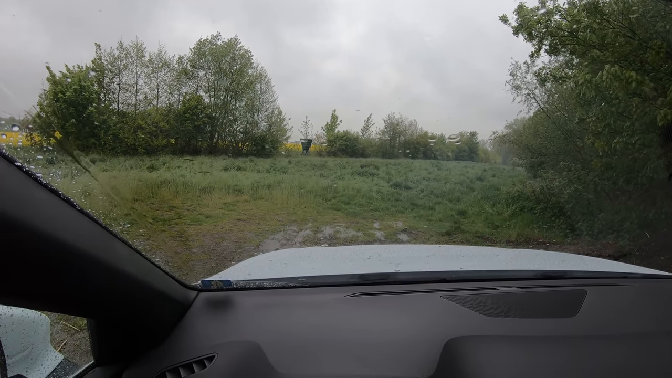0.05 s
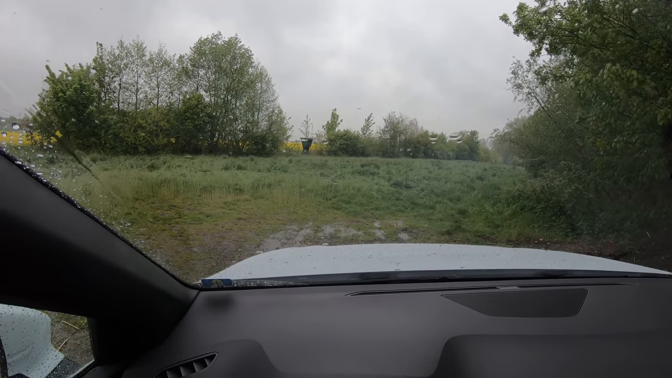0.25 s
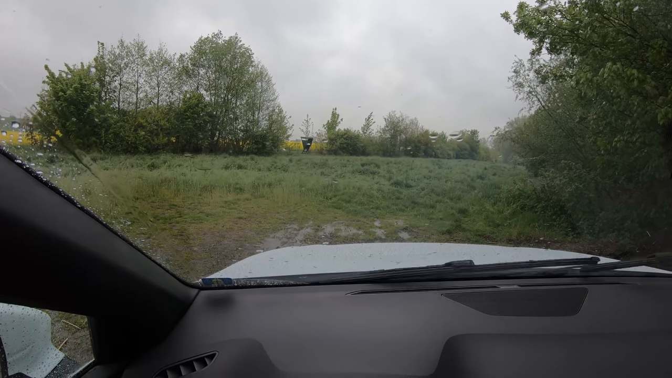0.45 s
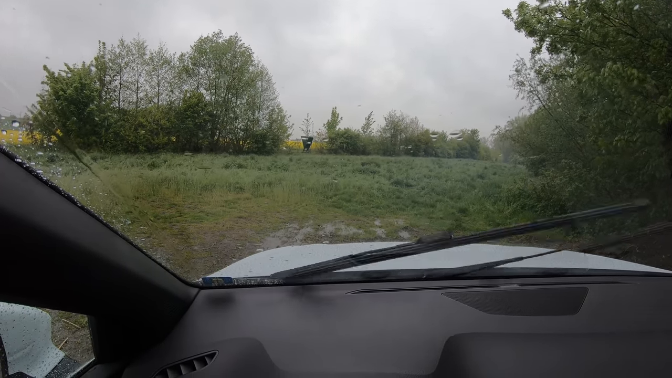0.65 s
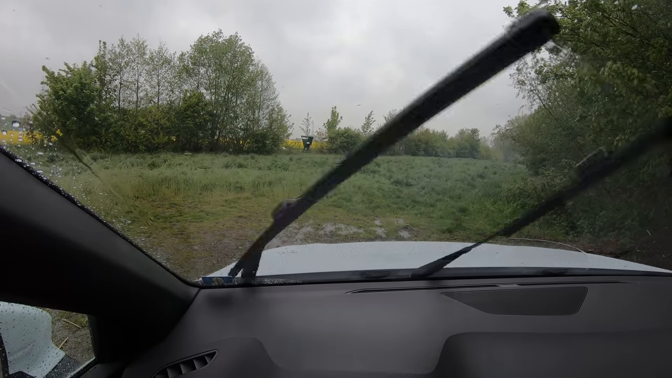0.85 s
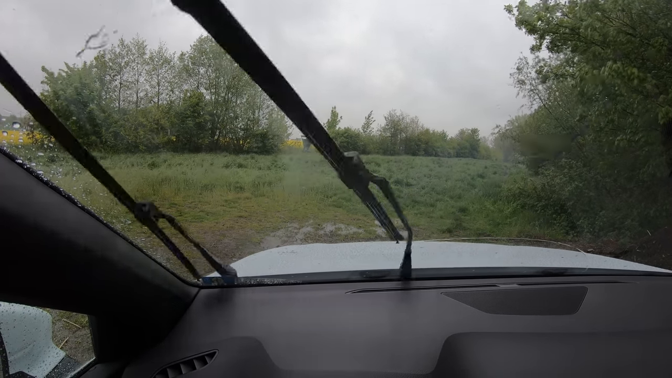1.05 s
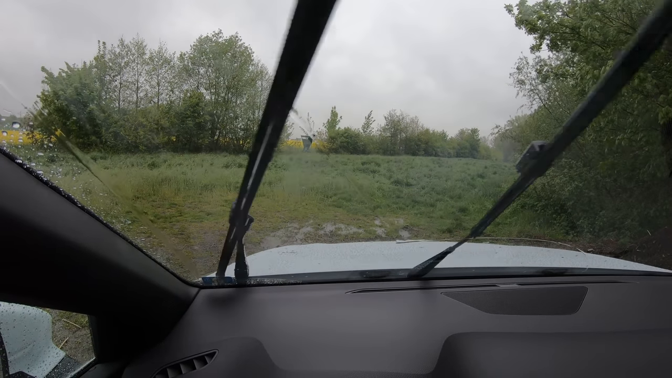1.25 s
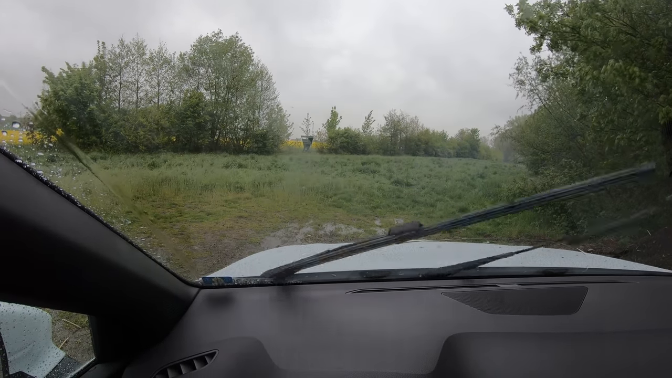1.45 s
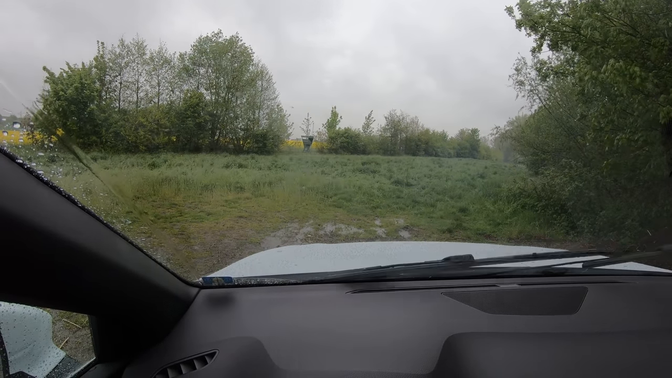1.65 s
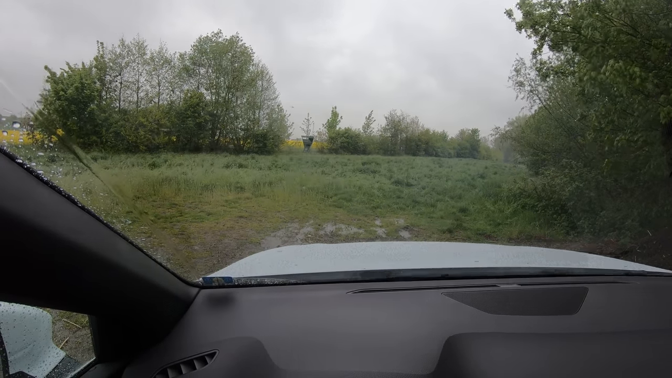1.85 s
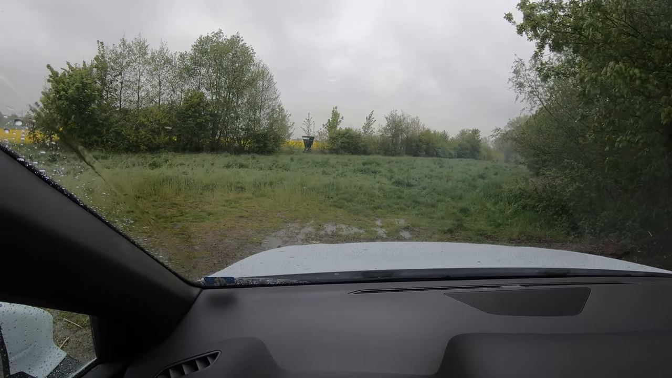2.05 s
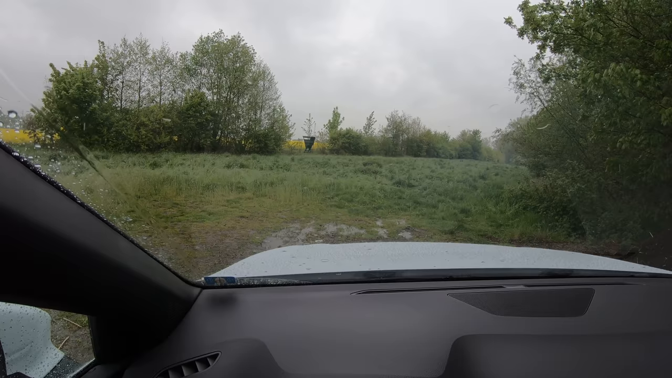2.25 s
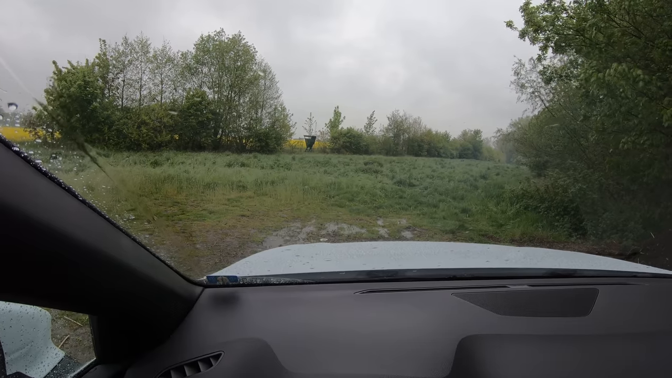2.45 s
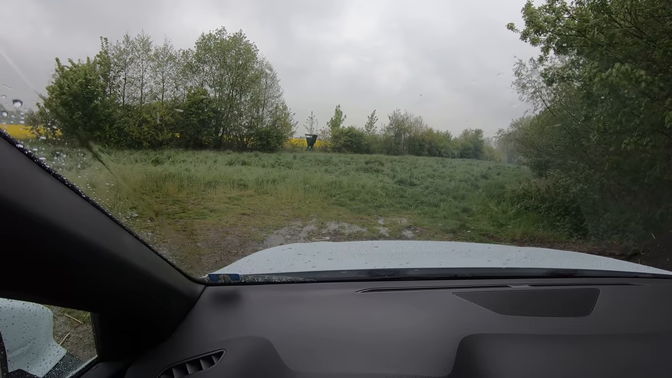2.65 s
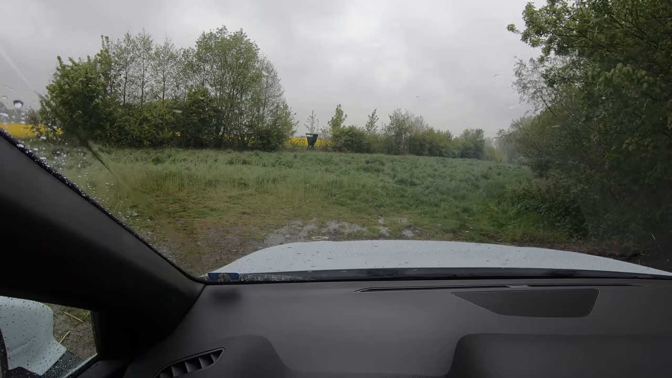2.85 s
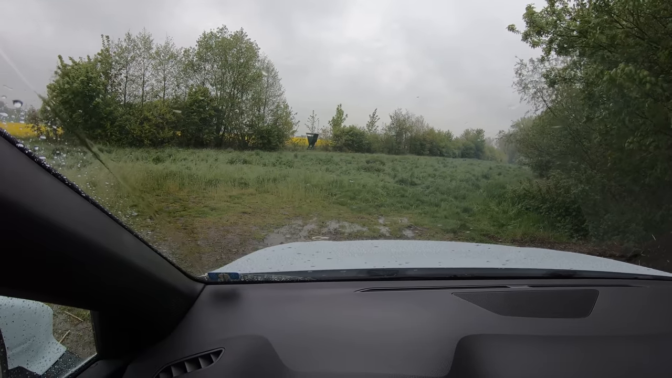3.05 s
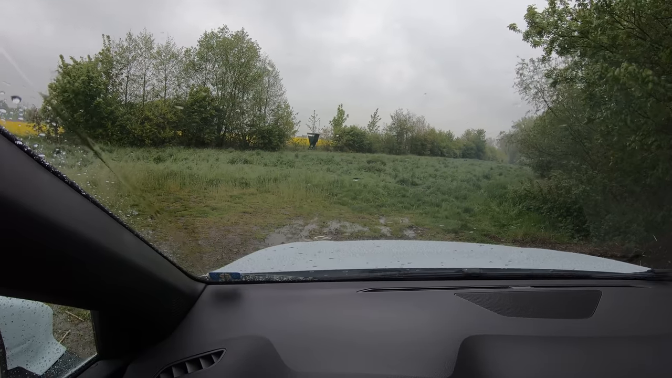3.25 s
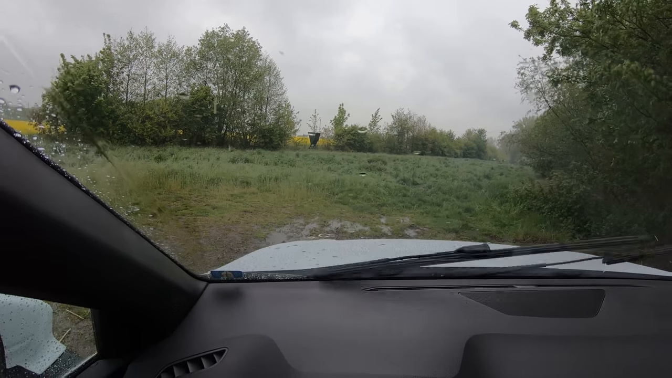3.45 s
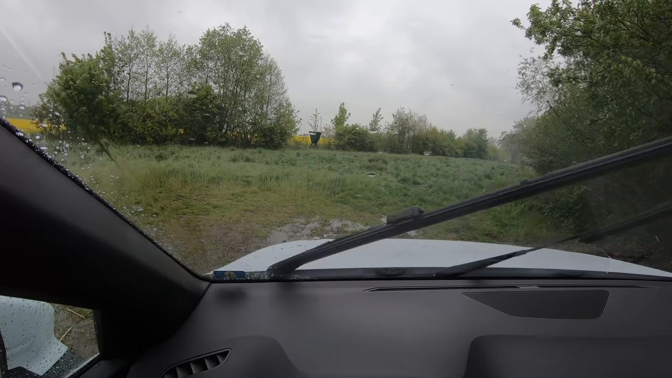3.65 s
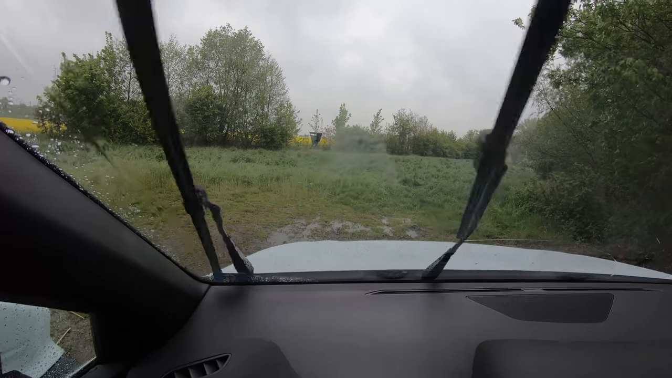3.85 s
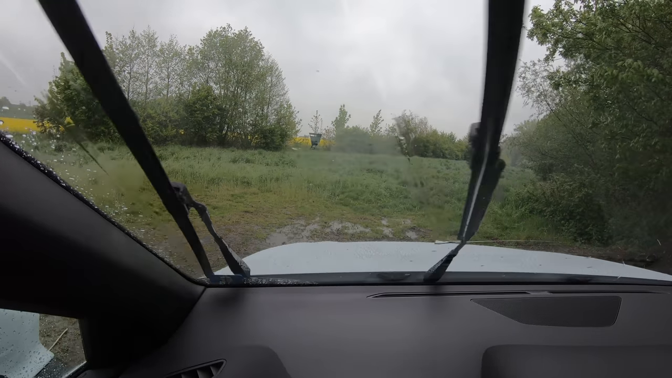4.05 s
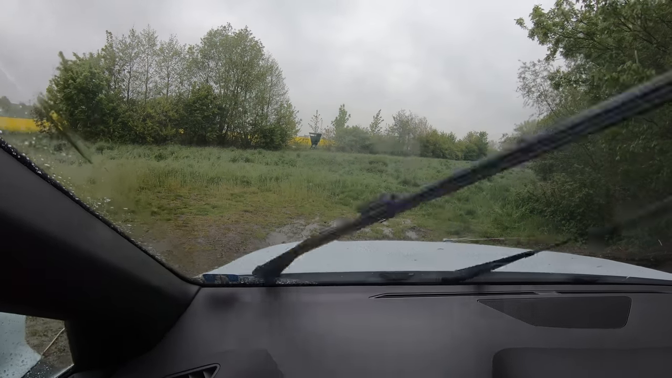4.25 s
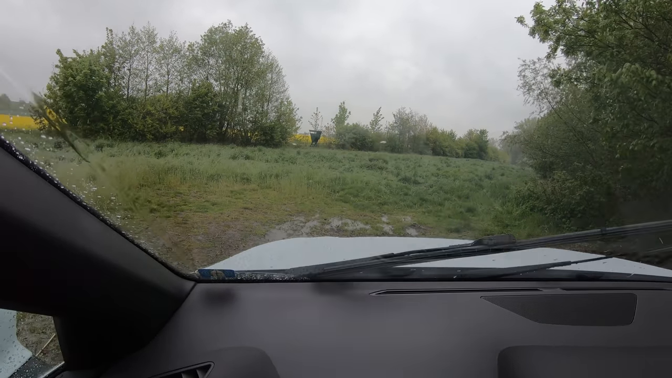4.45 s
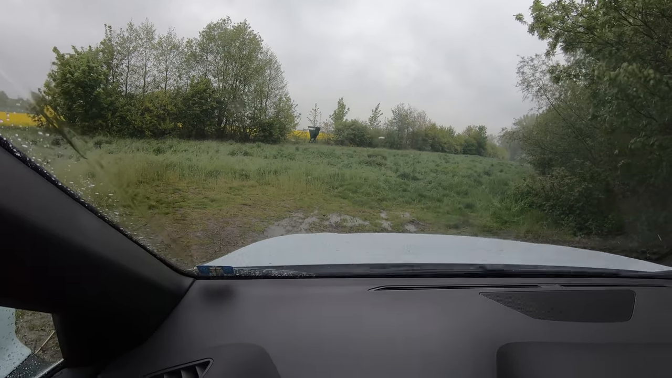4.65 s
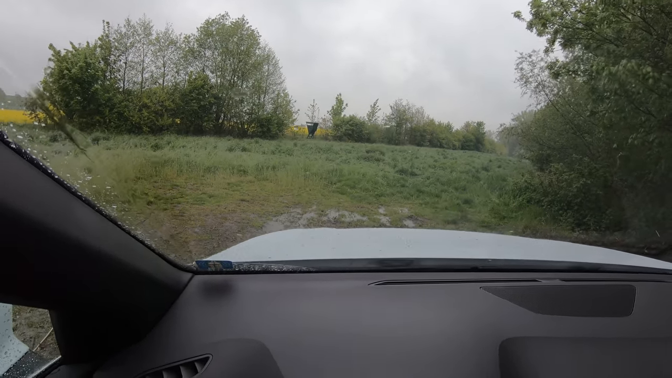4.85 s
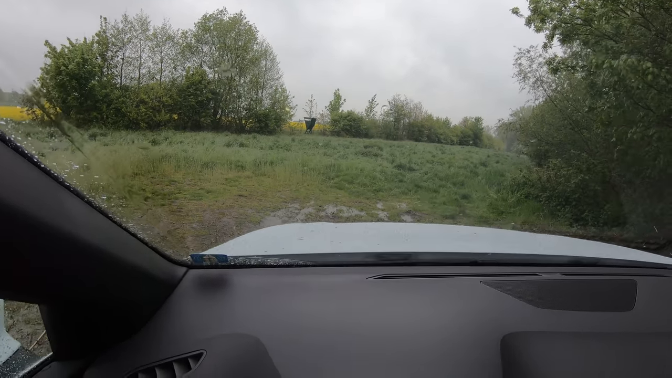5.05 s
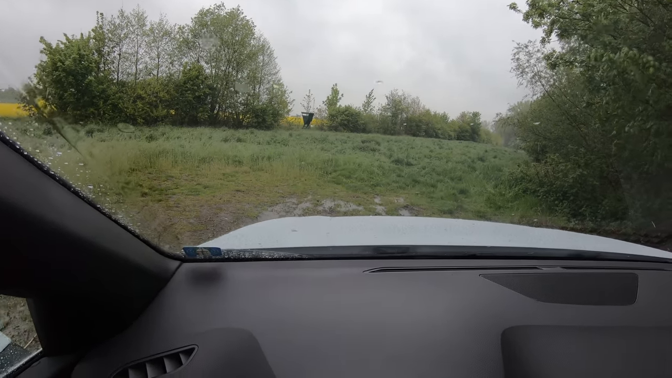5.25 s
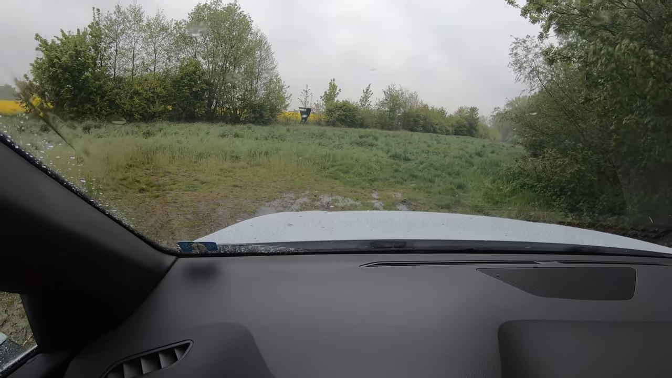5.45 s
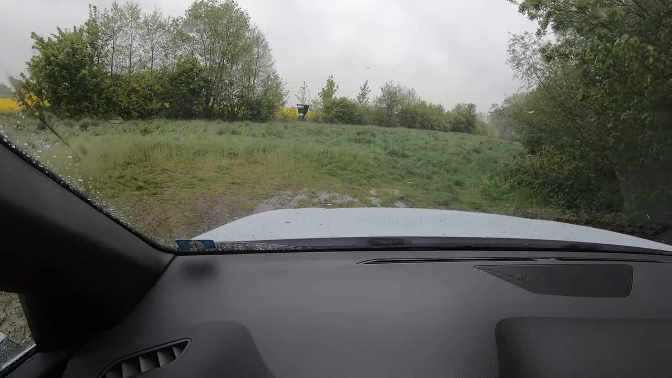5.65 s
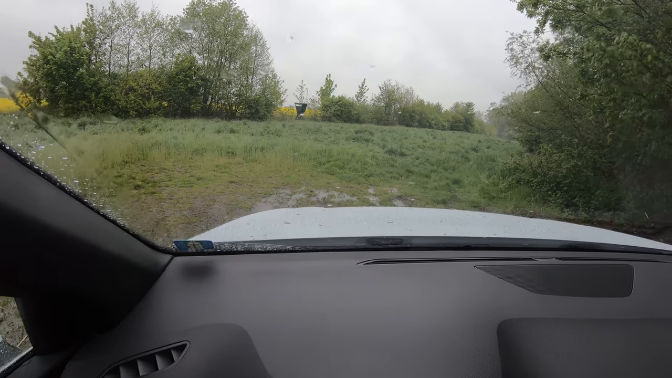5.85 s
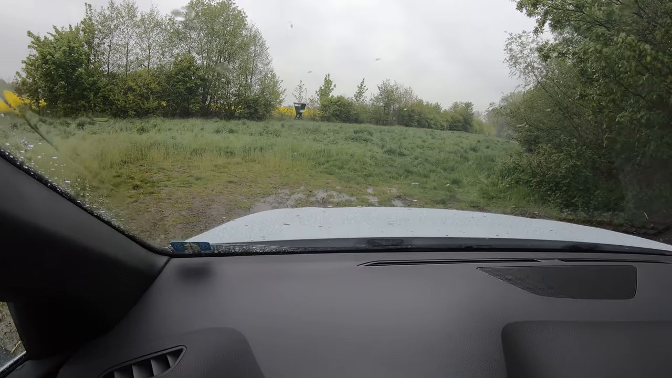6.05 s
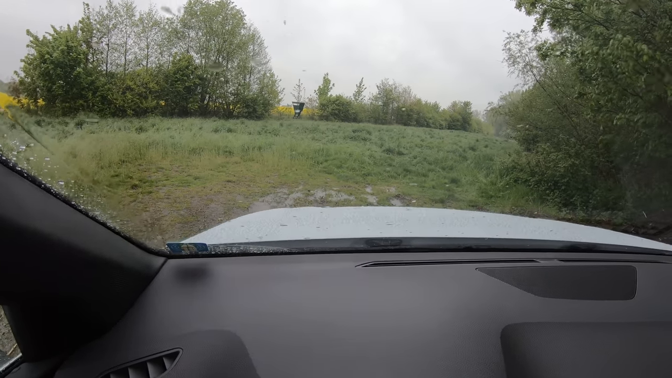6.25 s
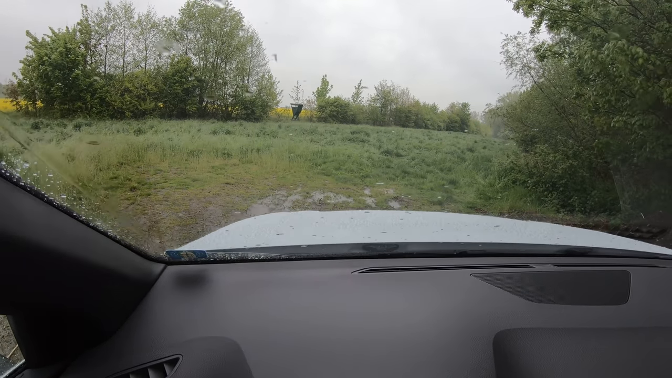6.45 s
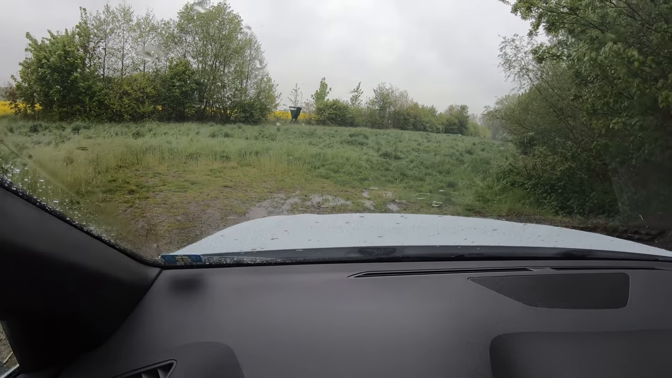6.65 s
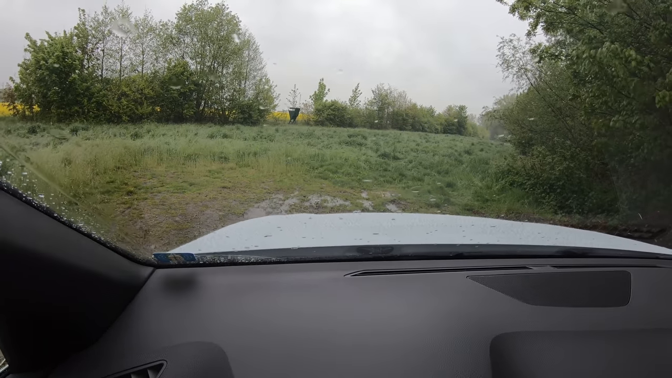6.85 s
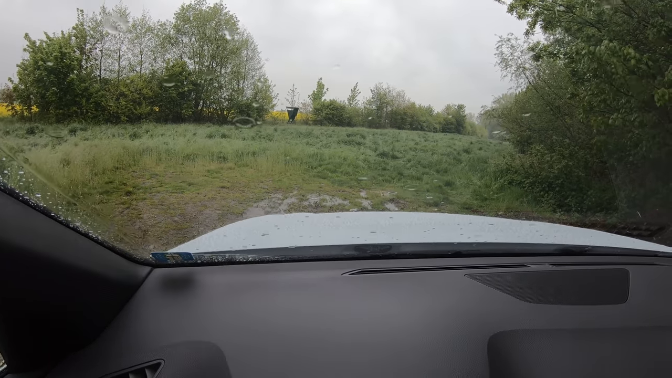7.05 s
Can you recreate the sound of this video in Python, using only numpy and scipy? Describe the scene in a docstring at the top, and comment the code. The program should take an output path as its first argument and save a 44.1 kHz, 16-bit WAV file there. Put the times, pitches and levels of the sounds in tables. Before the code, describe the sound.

A stereo microphone in a quiet car interior catches two slow windscreen wiper cycles. Each begins with a low, woody knock and motor throb, thuds again at the turn, and returns with short low groans of rubber. The wiper sound is bassy and central; fine rain patter, fat drops and sharp ticks on glass surround it, continuing alone at the end.

```python
"""Wipers make two slow sweeps and rest, heard from inside a parked car in light rain.
Motor and linkage shake the low modes of the body shell: noise throbs with the shaft, pushes ring as thuds
when the wipes start and when the blades flip, and short tones swell as the blades judder.
Drops, as noise bursts through resonances, tap roof and glass over a soft wash of random spectra.
A fine wet hiss, a faint steady hum and one brief puff of treble noise complete the cabin."""
import sys
import numpy as np
from scipy import signal
from scipy.io import wavfile
from scipy.ndimage import uniform_filter1d

SR = 44100
rng = np.random.default_rng(int(sys.argv[2]) if len(sys.argv) > 2 else 0)


def store_wav(level_fs):
    """Save 16-bit WAV to argv[1]."""
    pcm = np.round(np.clip(np.atleast_2d(level_fs), -1, 1) * 32767)
    wavfile.write(sys.argv[1], SR, pcm.T.astype(np.int16))


N = 313255  # length in samples

SHAFT_HZ = 38.5  # wiper motor shaft, also the pitch of the lowest cabin mode
UPPER_HZ = 270  # shell modes above this count as upper modes

# the rain over time: (time [s], level [dB], treble tilt [dB per octave], wet hiss level [dB])
RAIN_COURSE = [(0.0, -57.5, -1, -78.5), (.4, -55.5, -3.5, -64.5), (.8, -56, -2, -67.5),
               (1.14, -54.5, -5.5, -65.5), (1.28, -50.5, -4.5, -64), (1.58, -60, -2, -71.5),
               (1.94, -51.5, -6, -65), (2.3, -58.5, -2, -72.5), (2.65, -54.5, -1, -69.5),
               (3.0, -54.5, -3, -86.5), (3.3, -53.5, -3, -64), (3.749, -59, 3.5, -88),
               (4.1, -52, -0.5, -69), (4.5, -62, 2.5, -72.5), (5.05, -60.5, 2.5, -77.5),
               (5.5, -59.5, 0, -94), (5.8, -58, 2.5, -76), (6.118, -55.5, 2, -63.5),
               (6.5, -57.5, 1.5, -79.5), (7.1, -58, 0.5, -77)]
# shell and dashboard modes: (frequency [Hz], level [dB], t60 [s])
SHELL_MODES = [(66.5, -7, 0.57), (78.8, -4.5, 0.29), (98.6, -14.5, 0.4), (120, -5.5, 0.22),
               (136, 6.5, 0.16), (173, -9, 0.37), (225, -18, 0.46), (296, -8, 0.13), (343, -8, 0.21),
               (368.7, -10.5, .08), (394, -24.5, 0.02), (455, -28, 0.25), (622, -11.5, 0.032),
               (860, -34.5, 0.082), (1100, -44.5, 0.061), (1445, -46.5, .04)]
# starts of the wipes, which both run the same course: (time [s])
WIPE_STARTS = [.26, 3.162]
# one wipe, up, flip, down and park: (time after the start [s], linkage drag [dB],
# pitch of the dragging arm [Hz], deep sway [dB], blade rub [dB], lowest cabin mode [dB])
WIPE_COURSE = [(0, -39.5, 159, -65.5, -64.5, -58.5), (.1, -23, 129.5, -56, -40, -66),
               (.21, -40, 111.5, -70, -76.5, -34), (.33, -42, 110, -65, -61, -39),
               (.5, -48, 157, -64, -59, -59.5), (.7, -50.5, 158.4, -63, -58.5, -93),
               (.83, -47, 165, -63, -56, -59), (.96, -61.5, 122, -58.5, -42.5, -31),
               (1.05, -39.5, 113.2, -56, -55.5, -44), (1.2, -45, 132.7, -59, -72, -45),
               (1.43, -41.5, 121, -49, -55.5, -43.5), (1.65, -45, 129.6, -46, -70, -56.5),
               (1.77, -32.5, 120, -56.5, -75, -48.5), (1.9, -67.5, 100.4, -83.5, -81, -70),
               (2.1, -92, 143, -79, -74, -77)]


def amp(db):
    """dB to gain."""
    return 10 ** (np.asarray(db) / 20)


def evened(x):
    """Scales to rms 1."""
    return x / np.sqrt(np.mean(x ** 2) + 1e-20)


def peaked(x):
    """Scales to peak 1."""
    return x / abs(x).max()


def read(points, hz):
    """Reads a spectrum table at the given frequencies, along a log frequency axis."""
    f, value = np.transpose(points)
    return np.interp(np.log(hz + 1), np.log(f + 1), value)


def add(mix, s, sound):
    """Mixes a sound in at s seconds, cut off at the end of the mix."""
    part = mix[..., round(s * SR):][..., :sound.shape[-1]]
    part += sound[..., :part.shape[-1]]


def ring(x, hz, width):
    """A two-pole band-pass resonance whose response to a unit click has height 1."""
    r, w = np.exp(-np.pi * width / SR), 2 * np.pi * hz / SR
    return signal.lfilter([.5, 0, -.5], [1, -2 * r * np.cos(w), r * r], x)


def glide(x, hz, width):
    """A moving resonance: shift the curve hz to zero, smooth twice, shift back."""
    turn = np.exp(2j * np.pi * np.cumsum(hz) / SR)
    r = np.exp(-np.pi * width / SR)
    smooth = signal.lfilter([1 - r], [1, -r], x / turn)
    smooth = signal.lfilter([1 - r], [1, -r], smooth)
    return (turn * smooth).real


def coloured(x, points):
    """Causal (minimum-phase) filter with the given spectrum, floored at -100 dB."""
    gain_db = read(points, abs(np.fft.fftfreq(4096, 1 / SR)))
    log_gain = np.log(amp(np.maximum(gain_db, -100)))
    taps = np.fft.ifft(np.exp(np.conj(signal.hilbert(log_gain)))).real[:2048]
    taps = taps.reshape((1,) * (x.ndim - 1) + (-1,))
    return signal.oaconvolve(x, taps, axes=-1)[..., :x.shape[-1]]


def rain_level():
    """How hard the rain falls, as a gain over time."""
    s, level_db, *_ = np.transpose(RAIN_COURSE)
    return amp(np.interp(np.arange(N) / SR, s, level_db))


def wash():
    """Distant rain merges into noise: random short-time spectra with drifting patches."""
    # spectrum of the wash: (frequency [Hz], relative level [dB])
    wash_colour = [(120, 0), (200, 6), (283, -4.5), (472, -2), (625, -5.5), (775, 1.5), (899, -9.5),
                   (1080, -5.5), (1830, -7), (2340, -16), (3480, -21.5), (7820, -27.5), (10400, -40),
                   (13500, -88), (22000, -120)]
    # left-right likeness: (frequency [Hz], share in common [-1 to 1])
    likeness = [(100, 0), (300, 1), (600, 0.19), (1200, 0), (2500, 0.4), (5000, 0.12), (9000, 0.)]
    frames, hz = N // 256 + 5, np.fft.rfftfreq(1024, 1 / SR)
    a, b, c, d, patches = rng.standard_normal((frames, 513, 5)).T
    patches = uniform_filter1d(patches, size=40, axis=0)  # across frequency
    patches = evened(uniform_filter1d(patches, size=5, axis=1))  # across time
    same = np.clip(read(likeness, hz), -1, 1)[:, None]
    left = a + 1j * b
    right = same * left + np.sqrt(1 - same ** 2) * (c + 1j * d)
    s, _, tilt_db, _ = np.transpose(RAIN_COURSE)
    t = np.arange(frames) * 256 / SR
    treble = np.clip(np.log2(hz / 1500 + 1e-9), 0, 2)[:, None]  # octaves above 1500 Hz, at most 2
    level_db = read(wash_colour, hz)[:, None] + 2.2 * patches + treble * np.interp(t, s, tilt_db)
    spectra = np.array([left, right]) * amp(level_db)
    return evened(signal.istft(spectra, nperseg=1024, noverlap=768)[1][:, :N])


def patter(count=12):
    """Many small drops, each a short noisy tap on one panel, left or right; a few are larger."""
    # colour of small drops on roof and glass: (frequency [Hz], filter gain [dB])
    tap_colour = [(120, -17), (200, 35), (269, -17.5), (387, 0), (576, -7), (1110, 8), (1380, 2), (3430, 3),
                  (4040, -11), (7820, -93.5), (10400, -36), (13500, -100.5), (22000, -120)]
    taps_per_s, level_db = 1100, -4  # average rate; level against the wash ahead of the cabin colour
    size = amp(4.5 * np.minimum(rng.exponential(1, N), 4))
    size = size * (rng.random(N) < taps_per_s / SR)
    panel = rng.integers(0, count, N)
    t, out = np.arange(2500) / SR, np.zeros((2, N))
    for k, hz in enumerate(np.geomspace(400, 6000, count)):
        crack = rng.standard_normal((2, len(t))) * amp(-60 * t / 0.021)
        tap = crack + 2 * evened(ring(crack, hz, .5 * hz)) * crack.std()
        tap = tap + 0.73 * tap[::-1]  # each channel hears some of the other
        side = amp(7.6 * (-1) ** k * np.array([[1], [-1]]))  # panels alternate left and right
        hits = (size * (panel == k))[None]
        out += side * signal.oaconvolve(hits, tap, axes=1)[:, :N]
    return amp(level_db) * evened(coloured(out, tap_colour))


def fizz():
    """A band of grainy wet hiss: noise with a fast random level, partly alike in both channels."""
    s, *_, db = np.transpose(RAIN_COURSE)
    noise = rng.standard_normal((2, N))
    flicker = evened(uniform_filter1d(rng.standard_normal((2, N)), size=220, axis=1))
    grain = amp(3.8 * flicker)  # it crackles finely
    band = ring(grain * (noise + 0.4 * noise[::-1]), 3090, 1800)
    band = ring(band, 3000, 1900)
    return amp(np.interp(np.arange(N) / SR, s, db)) * evened(band)


def hum():
    """A thin steady low tone with noise in narrow resonances around it."""
    # noise around the tone: (frequency [Hz], width [Hz], level [dB])
    hum_bands = [(151.4, 4.6, -66), (165, 20, -63)]
    tone_hz, tone_db = 148.4, -58.5
    out = amp(tone_db) * np.sqrt(2) * np.sin(2 * np.pi * tone_hz * np.arange(N) / SR)
    for x, (hz, width, db) in zip(rng.standard_normal((len(hum_bands), N)), hum_bands):
        out = out + amp(db) * evened(ring(ring(x, hz, width), hz, width))
    return out


def boom():
    """A low tone at the shaft rate with some noise in the same mode, fed by the wipes and by rocking."""
    # brief low rocking swells of the body: (middle [s], level [dB], half-length [s])
    rocks = [(2.528, -65, 0.085), (4.894, -39.5, 0.076), (5.043, -53, 0.096), (6.913, -63, 0.093)]
    still_db = -83  # the lowest mode at rest
    t, (s, *_, db) = np.arange(N) / SR, np.transpose(WIPE_COURSE)
    level = amp(still_db)
    for start in WIPE_STARTS:
        level = level + amp(np.interp(t - start, s, db, -120, -120))
    for mid, top_db, length in rocks:
        level = level + amp(top_db) * np.exp(-2 * ((t - mid) / length) ** 2)
    mode_noise = evened(ring(rng.standard_normal(N), SHAFT_HZ, 4.3))
    return level * evened(np.sin(2 * np.pi * SHAFT_HZ * t) + 0.45 * mode_noise)


def drops():
    """Fat drops shake the roof modes; sharp ones click across the treble."""
    # fat drops on the roof: (time [s], level [dB], pitch between the two middle modes [Hz],
    # lowest mode [dB], top mode [dB], left over right [dB])
    pats = [(0.161, -45, 764, -9, 1, -3), (0.228, -56.5, 748, -13, 17, -4), (0.601, -50, 703, -4, 1, -4),
            (0.643, -48, 732, -17, -0.5, -2), (0.795, -46, 1010, -29, -26, 5),
            (0.824, -48.5, 1030, -5, -13, 1), (0.91, -43.5, 770, -10, -18, 2),
            (1.087, -43.5, 1050, -4, 1, 1), (1.251, -42, 718, -12, -31, -7.5),
            (1.432, -48, 1140, -1, -26, -3), (1.49, -50, 727, -22, -19, -3), (1.601, -47, 961, -15, -6, 3),
            (1.824, -54, 778, -5, 7.5, 1), (1.977, -44, 1080, -5, -11, 2),
            (2.232, -50.5, 1170, -26, -17, 5), (2.385, -48.5, 1030, -13, -5, 0),
            (2.47, -48, 735, -16, -9, -5), (2.523, -47, 754, -8, -2, 0.5), (2.594, -58.5, 764, -6, 8, -6),
            (2.715, -39.5, 1140, -11, -2.5, -2), (2.774, -46, 1100, 0.5, -18, 3),
            (2.843, -48, 800, -22, 8.5, 3.5), (3.003, -49, 1090, -7, -21, 2),
            (3.548, -52, 781, -10, -7, 4.0), (3.597, -40.5, 1140, -21, -11, 2),
            (3.641, -42, 700, -6, -6, 0), (3.748, -46.5, 1130, -6, 1, 3), (3.863, -54, 799, -11, -11, 10),
            (3.885, -45.5, 1070, -23, -12, -1), (3.934, -42, 1110, -6, -7, 0),
            (3.992, -48, 727, -6, 2, 2.0), (4.034, -45, 1105, -9, -10.5, 2.0),
            (4.251, -42.5, 1080, -1.5, -16, 0), (4.366, -44.5, 800, -4.5, -25, 2),
            (4.528, -43, 1100, -1, -13, -1), (4.615, -50.5, 1100, -5, -1, -3),
            (4.832, -50.5, 1130, -19, -19, -5), (5.019, -51, 1040, -23, -8, -0.5),
            (5.055, -44.5, 880, -23, -10, 0), (5.136, -53, 1100, -7, -1, -2.0),
            (5.266, -44, 1070, -7, -32, -2), (5.393, -50, 1030, -9, -18, -2),
            (5.535, -46, 925, -4.5, -27, -4), (5.586, -51.5, 770, -28, -25, 6),
            (5.644, -52, 1020, -20, -11, 0), (5.686, -50, 703, -6, -9, 3),
            (5.711, -45.5, 1100, -1.5, -0.5, 1), (5.816, -53, 816, -9, -13, -2),
            (6.005, -46, 899, -18, 2, -1), (6.031, -49.5, 805, -18, -14, -5),
            (6.241, -54, 1150, -7, 3, -1.5), (6.389, -51, 867, -21, -16, -2.0),
            (6.62, -56, 1050, -20, -7, -3.0), (6.699, -53, 1160, -18, -7, -8),
            (6.715, -40.5, 895, -17, -3, -1.5), (6.839, -49, 1000, -4, -16, -3),
            (6.981, -56, 774, -2, 6, 2.5), (7.032, -53, 743, -11, 0, 1.5)]
    # roof modes: (frequency [Hz], width [Hz])
    roof_modes = [(410, 160), (770, 420), (1110, 380), (1850, 590)]
    # the sharpest drops on the glass: (time [s], level [dB], centre [Hz],
    # left over right [dB], splash relative to the impact [dB])
    ticks = [(0.162, -43, 3430, -2.5, -7), (0.2004, -45, 2730, -3.5, 4), (0.2293, -45, 3050, -3.0, -7),
             (0.2653, -49, 2500, -5.0, -9), (0.2794, -44.5, 3350, -3.0, -8.5), (0.378, -49.5, 2850, 1, -5),
             (0.5106, -49, 2880, -1.0, -8), (0.5746, -46, 2730, 3, -12), (0.6452, -43.5, 2500, -1.5, -7),
             (0.8238, -33.5, 3300, 1, -12), (1.0835, -41, 2950, -1, -1), (1.289, -50, 3040, -9, -7),
             (1.3363, -48, 2850, -2.0, -9), (1.4905, -49, 2630, 0.0, -4), (1.5485, -50, 2660, -7, -5),
             (1.7248, -46, 2750, -4, -5), (1.8264, -45.5, 2710, -0.5, -6), (1.9036, -49, 2500, -2.5, -6),
             (2.028, -46, 3230, -3, -5), (2.1046, -50, 2760, -6, -7), (2.246, -44.5, 3150, -1, -11),
             (2.2777, -51, 3040, -0.5, -9), (2.2987, -47.5, 3270, 0, -6), (2.4034, -47, 3150, 3, -9),
             (2.4694, -57, 2950, 0.5, -9), (2.5516, -43, 2780, 1.0, -9), (2.59, -44, 3560, -1.0, -11),
             (2.6496, -48, 3100, -1.0, -9), (2.6738, -49, 2770, -5, -9), (2.718, -43.5, 3410, 0.5, -5),
             (2.8436, -52, 2760, -2, -9), (2.8814, -49, 2570, -2.0, -11), (2.9603, -45.5, 3070, 3, -8),
             (3.112, -47.5, 3320, 0.0, -7), (3.1982, -48.5, 3510, 1, -9.5), (3.2483, -43, 3100, -0.5, -8.5),
             (3.2824, -43.5, 2600, -4, -7.5), (3.5468, -42.5, 3750, 0.0, -8), (3.5987, -38.5, 3210, 5, -12),
             (3.6287, -46, 2850, -6, -9), (4.1889, -54, 3160, -1.5, -8), (4.2487, -38.5, 3100, 1.5, -10),
             (4.4574, -51.5, 2560, 0.5, -9), (4.5277, -42.5, 3230, 4, -9), (4.5776, -35.5, 2790, -1, -14),
             (4.5979, -40.5, 3070, 5, -12), (4.6144, -39, 2540, 5, -15), (4.7137, -54, 2860, -2, -12),
             (4.7598, -48, 3130, -1.5, -9), (4.852, -46.5, 3400, -4, -11), (4.9127, -53, 2570, 1, -9),
             (4.9357, -48, 2650, 2, -13), (4.963, -44, 2500, 0.0, -11), (4.9781, -40.5, 3040, -1.5, -19),
             (5.0185, -35.5, 3440, 0, -23), (5.1926, -47, 2600, -0.5, -12), (5.3717, -51, 3070, -3, -9),
             (5.6405, -48, 3210, -3.0, -9), (5.69, -47, 3010, 8, -15), (5.7054, -40, 3050, 3, -10),
             (5.893, -45.5, 2700, 0.0, -14), (6.0057, -41, 3380, 1.0, -14), (6.0304, -43, 2830, -1.5, -9),
             (6.2387, -40, 2590, 3, -7), (6.378, -51, 2600, -1.0, -11), (6.443, -46, 3340, -3, -8),
             (6.4951, -52, 2980, 0.0, -9), (6.5605, -44, 3340, -1.0, -7), (6.6206, -42, 3010, -6, -15),
             (6.6992, -39.5, 3180, 1, -11), (6.8962, -45.5, 3180, 2, -6), (7.001, -43.5, 3750, 1, -13),
             (7.0334, -46.5, 3400, 5, -9), (7.0637, -42, 3110, 0.0, -8.5)]
    pat_t60_s, tick_t60_s = 0.13, 0.049
    detune_db_per_octave = 8  # a middle mode answers less the further it lies from the drop's pitch
    out, t, sides = np.zeros((2, N)), np.arange(5000) / SR, np.array([[.5], [-.5]])
    for s, db, pitch_hz, low_db, top_db, pan_db in pats:
        noise = rng.standard_normal((2, len(t)))
        spread, impact = amp(-60 * t / pat_t60_s), 1.9 * amp(-60 * t / 0.0043)
        push = (noise + 0.42 * noise[::-1]) * (spread + impact)
        middle_db = [-detune_db_per_octave * abs(np.log2(hz / pitch_hz)) for hz, _ in roof_modes[1:3]]
        for mode_db, (hz, width) in zip([low_db, *middle_db, top_db], roof_modes):
            mode = ring(ring(push, hz, 1.35 * width), hz, 1.35 * width)
            add(out, s, amp(db + mode_db + pan_db * sides) * peaked(mode))

    # lesser ticks fall by chance
    faint_count, faint_db, faint_spread_db, faint_splash_db = 90, -55.5, 11.5, -7.5
    low_hz, high_hz, faint_pan_db = 2500, 3400, 5
    when, where, size, side = rng.random((faint_count, 4)).T
    faint = np.transpose([when * N / SR,
                          faint_db + faint_spread_db * (2 * size - 1),
                          low_hz + (high_hz - low_hz) * where,
                          faint_pan_db * (2 * side - 1),
                          np.full(faint_count, faint_splash_db)])
    for s, db, hz, pan_db, splash_db in [*faint, *ticks]:
        noise = rng.standard_normal((2, len(t)))
        noise = noise + 0.22 * noise[::-1]
        wide = evened(ring(noise, 2500, 4200))
        splash = evened(evened(ring(noise, hz, 0.3 * hz)) + 0.23 * wide)
        splash = splash * amp(splash_db - 60 * t / tick_t60_s)
        snap = wide * amp(-60 * t / 0.002)  # the impact is broad and dies first
        tick = (snap + splash) * np.minimum(t / 0.00037, 1)
        add(out, s, amp(db + pan_db * sides) * peaked(tick))
    return out


def judders():
    """Stick and slip of the blades swell and fade, each at its own low pitch, a little unevenly."""
    # a few cycles each: (middle [s], level [dB], pitch [Hz], half-length [s])
    slips = [(.275, -37, 161, .04), (.810, -40.5, 133.7, 0.053), (1.135, -32.5, 194, 0.04),
             (1.345, -24.5, 131.6, 0.044), (1.433, -51.5, 301, 0.07), (1.594, -31, 111, 0.071),
             (1.776, -33, 118.7, 0.085), (1.908, -37, 225, 0.042), (1.915, -45.5, 351, 0.04),
             (2.001, -48, 326, 0.038), (2.006, -28, 104.8, 0.089), (2.105, -40.5, 53.4, 0.077),
             (3.175, -29.5, 168.4, 0.029), (3.715, -41, 168.4, .07), (4.026, -33, 212, .06),
             (4.342, -33, 112, 0.084), (4.346, -36.5, 201, 0.059), (4.479, -38, 98.7, 0.097),
             (4.599, -31, 114.1, 0.067), (4.715, -29.5, 108.4, 0.058), (4.790, -33, 112.3, .06),
             (4.830, -28.5, 150.3, 0.047), (4.863, -28, 120, 0.039), (4.822, -38, 230.5, 0.054),
             (4.883, -42, 307, 0.045), (4.911, -24.5, 95, 0.056), (5.089, -56, 93.5, 0.1),
             (5.016, -38, 52.6, .1)]
    out = np.zeros(N)
    for s, db, hz, length in slips:
        noise = rng.standard_normal(12000)
        t = np.arange(0, 2 * min(length, .13), 1 / SR)
        tone = np.sin(2 * np.pi * hz * t + noise[0])  # random starting phase
        slip = tone + 0.17 * evened(ring(noise, 0.9 * hz, hz))[:len(t)]
        add(out, s - length, amp(db) * np.hanning(len(t)) ** 2 * slip)
    return out


def sweep(start):
    """Each shaft turn tugs the linkage, the blades drag; both shake the shell."""
    s, *columns = np.transpose(WIPE_COURSE)
    t = np.arange(0, s[-1], 1 / SR)
    drag_db, arm_hz, sway_db, rub_db, _ = (np.interp(t, s, c) for c in columns)
    noise = rng.standard_normal((2, len(t)))
    wander = evened(uniform_filter1d(noise[0], 4000))
    turns = np.cumsum(SHAFT_HZ * (1 + .04 * wander)) / SR  # the shaft runs slightly unevenly
    drive = (.5 + np.exp(-(turns % 1) / 0.21)) * noise[1]  # drag throbs once a turn
    rung = [(hz, amp(db) * ring(drive, hz, 2.2 / t60)) for hz, db, t60 in SHELL_MODES]
    sway = evened(sum(x for hz, x in rung if hz < 90))
    drag = evened(sum(x for hz, x in rung if 90 < hz < UPPER_HZ))
    drag = evened(drag + 3.1 * evened(glide(drive, arm_hz, 54.0)))  # the arm sings at a gliding pitch
    rub = evened(sum(x for hz, x in rung if hz > UPPER_HZ))
    total = amp(drag_db) * drag + amp(sway_db) * sway + amp(rub_db) * rub
    return start, total * signal.windows.tukey(len(t), .02)


def blows():
    """A rounded push of the linkage rings the shell; a short contact reaches the higher modes."""
    # blows: (time [s], level [dB], contact [ms], weight on deep modes [dB], weight on upper modes [dB])
    pushes = [(0.262, -48, 2.7, -12, 15), (.294, -37.5, 4.5, -6, 8), (0.322, -50, 5.3, 3, 14),
              (.341, -32.5, 3.3, -4.5, -9.5), (.352, -41.5, 1.57, 5, 11.5), (.366, -25.5, 2.24, -13, -15),
              (.374, -17.5, 5.6, 1, -7), (0.441, -39.5, 9, 12, 7), (1.115, -38.5, 1.4, -7.5, -15.5),
              (1.140, -36.5, 1.6, 2.5, -11.5), (1.188, -27.5, 1.46, -11, 5.5),
              (1.201, -19.5, 2.12, 2.5, -8.5), (1.251, -32.5, 5.2, 10, -1.5), (1.989, -32.5, 4.7, 4.5, 1.5),
              (3.162, -43.5, 3.6, -14, 8), (3.189, -32, 3.5, -17, 3.5), (3.212, -31, 5.5, -12, 0),
              (3.247, -21.5, 4.9, -16, -7), (3.258, -25, 1.44, -15.5, -12), (3.265, -17, 5.5, 0.5, -2),
              (3.297, -26, 5.8, -18.5, -5), (3.975, -42.5, 2, -5, -11), (4.016, -40, 1.9, 8, 9),
              (4.038, -39.5, 1.3, 5, -18), (4.082, -30.5, 1.5, -6, 15), (4.089, -32, 2.28, -2, 18),
              (4.097, -17, 2.7, 2.5, -3.5), (4.105, -35.5, .92, -16, 6.5), (4.148, -36.5, 4.1, 16, -12)]
    deep_hz = 105  # shell modes below this count as deep
    out = np.zeros(N)
    for s, db, contact_ms, deep_db, upper_db in pushes:
        push = np.zeros(SR // 2)
        bump = np.hanning(int(np.clip(contact_ms, .3, 12) * SR / 1000) + 3)
        push[:len(bump)] = bump / bump.sum()
        for hz, mode_db, t60 in SHELL_MODES:
            weight = amp(mode_db + deep_db * (hz < deep_hz) + upper_db * (hz > UPPER_HZ))
            add(out, s, amp(db) * weight * ring(push, hz, 2.2 / t60))
    return out


def hiss():
    """A short puff of treble noise, mostly different in the two channels."""
    # course of the puff: (time [s], level [dB])
    puff = [(2.39, -89), (2.396, -87), (2.416, -64), (2.452, -57), (2.49, -85)]
    # its spectrum: (frequency [Hz], filter gain [dB])
    puff_colour = [(3530, -20), (6000, -7), (6480, -13), (7240, -9), (7470, -1), (7820, 1), (8630, -1),
                   (10400, -10), (13500, -27), (22000, -120)]
    s, db = np.transpose(puff)
    t = np.arange(s[0], s[-1], 1 / SR)
    noise = rng.standard_normal((2, len(t)))
    noise = noise + 0.11 * noise[::-1]
    return s[0], amp(np.interp(t, s, db)) * evened(coloured(noise, puff_colour))


def scene():
    """Shell sounds sit near the middle of the cabin; the rain is all around."""
    # trim and glass as heard on a drop: (frequency [Hz], filter gain [dB])
    cabin_colour = [(60, -33.5), (130, -4.5), (260, -3.5), (400, 11), (7000, -4), (9000, -7), (10500, -35),
                    (11500, -48.5)]
    rubber_hz = 1120  # soft rubber and bushes pass little treble into the shell
    rain_low_hz = 135  # rain and hum leave the deep modes still
    rain = rain_level() * (wash() + coloured(patter(), cabin_colour))
    rain = rain + coloured(drops(), cabin_colour) + fizz() + hum()
    rain = signal.sosfilt(signal.butter(4, rain_low_hz, "high", fs=SR, output="sos"), rain)

    shell = boom() + judders() + blows()
    for start in WIPE_STARTS:
        add(shell, *sweep(start))
    shell = signal.sosfilt(signal.butter(2, rubber_hz, fs=SR, output="sos"), shell)
    spread = signal.lfilter([0] * 40 + [1], [1], shell) - shell  # a copy 40 samples late, less the direct sound
    upper = signal.sosfilt(signal.butter(2, 400., "high", fs=SR, output="sos"), spread)
    spread = spread + 1.5 * upper  # upper modes differ more between the channels
    mix = shell + amp(-22.5) * spread * np.array([[-1], [1]]) + rain
    add(mix, *hiss())
    return mix


def record(dry):
    """The microphone loses the deepest bass; then a steep low-pass limits the band."""
    low_hz, edge_hz = 28, 15000
    dry = signal.sosfilt(signal.butter(4, low_hz, "high", fs=SR, output="sos"), dry)
    band_limit = signal.firwin(511, edge_hz, window=("kaiser", 9), fs=SR)
    return signal.oaconvolve(dry, band_limit[None], "same")


dry = scene()
out = record(dry)
store_wav(out)
```